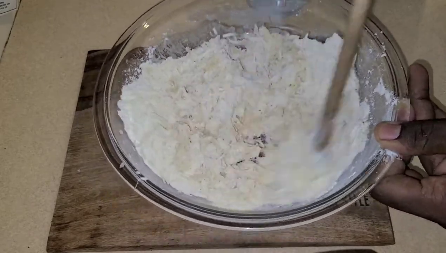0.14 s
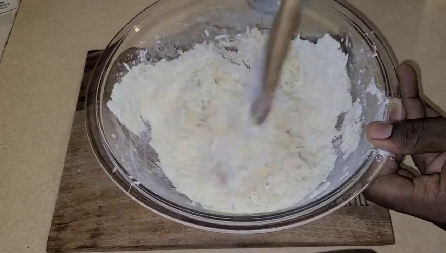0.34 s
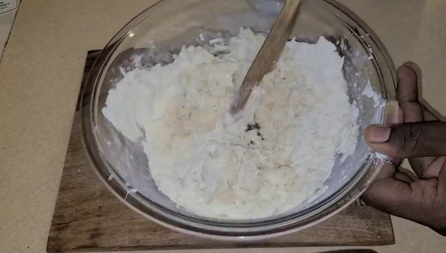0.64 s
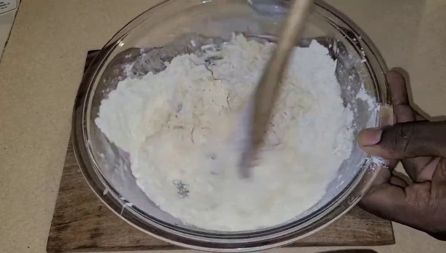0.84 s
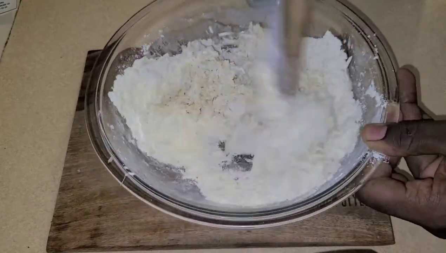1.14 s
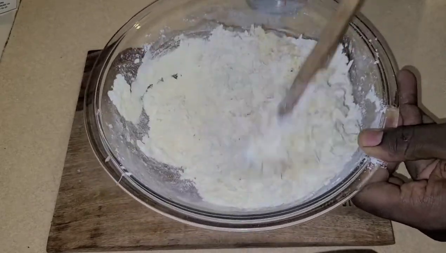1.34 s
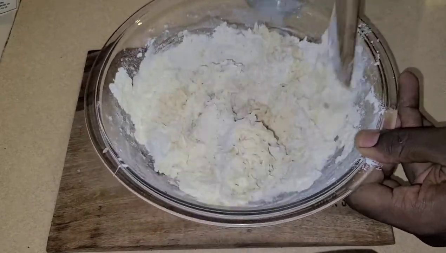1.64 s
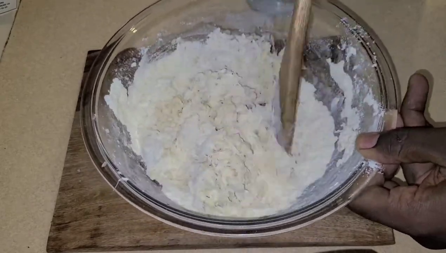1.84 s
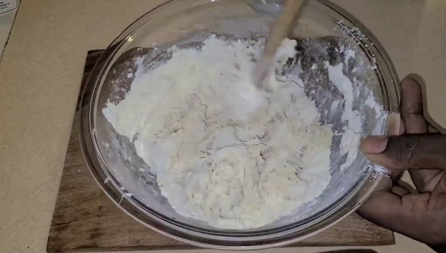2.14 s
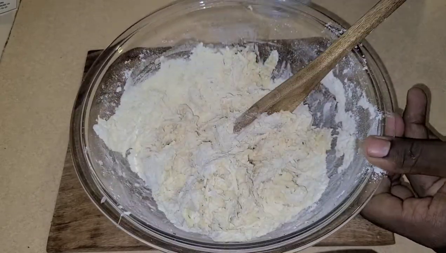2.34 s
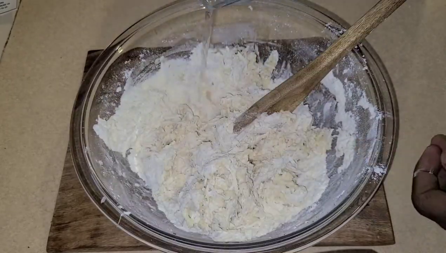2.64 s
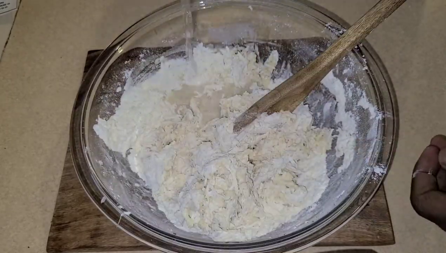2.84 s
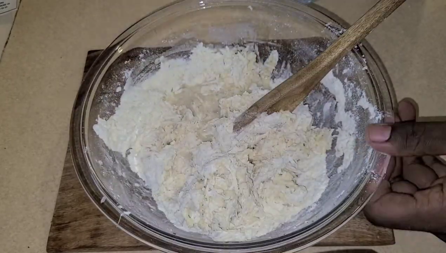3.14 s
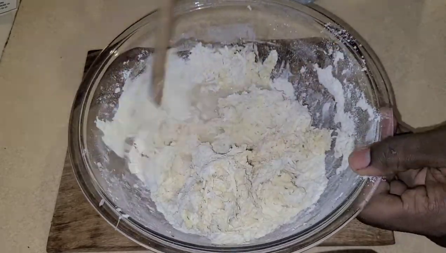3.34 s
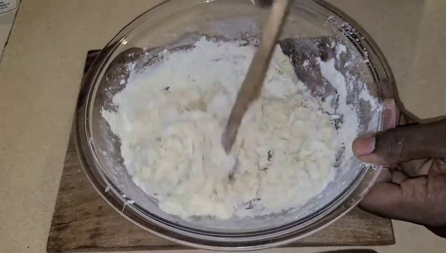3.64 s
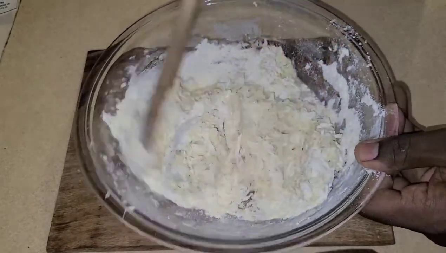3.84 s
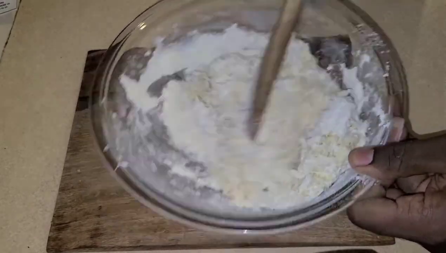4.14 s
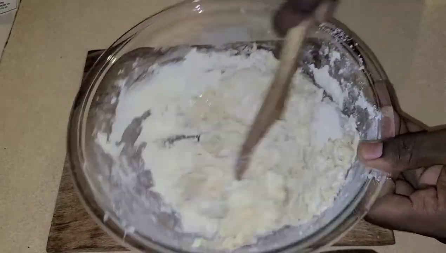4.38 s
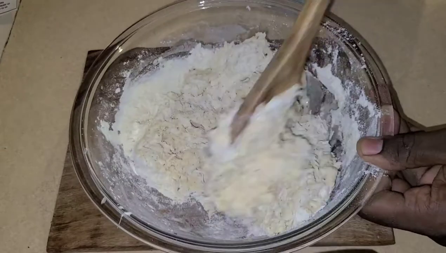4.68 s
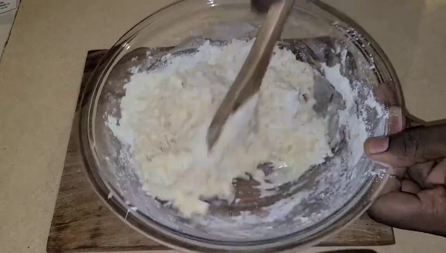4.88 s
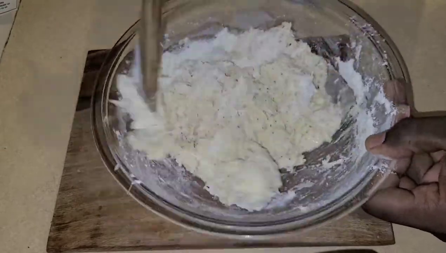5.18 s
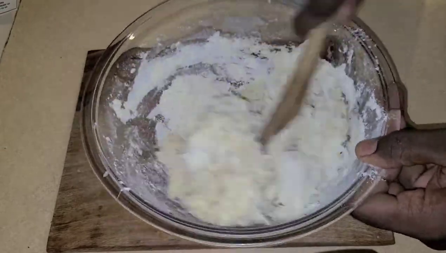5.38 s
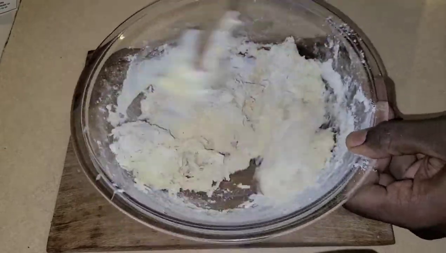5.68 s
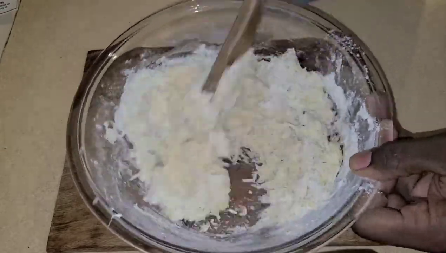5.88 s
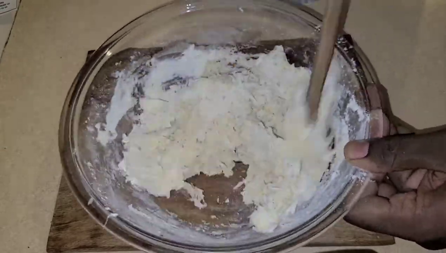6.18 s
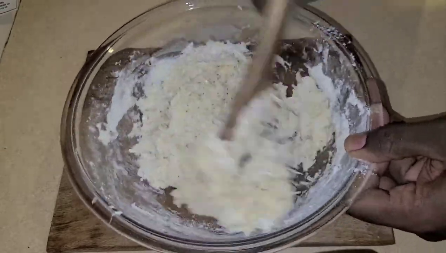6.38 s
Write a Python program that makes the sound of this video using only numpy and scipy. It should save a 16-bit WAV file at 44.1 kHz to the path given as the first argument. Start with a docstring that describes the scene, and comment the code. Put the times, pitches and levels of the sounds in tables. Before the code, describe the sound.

Close, dry stereo pickup in a small kitchen with low rumble and hum. A wooden spoon tears through stiff dough in short grainy strokes, knocking dully on a glass bowl that thuds on a board. Stirring pauses, a little water patters, a cup lands with a loud boom and crack, then stirring resumes harder, with heavier knocks.

```python
"""A wooden spoon stirs stiff, floury dough in a glass bowl on a wooden board: grainy noise bursts hiss and tear.
The spoon knocks on the dough-damped glass, heard as decaying modes, and the bowl thuds on the board as slow swings.
In a pause a dash of water patters as shaped noise, and a cup set down hard booms, cracks and rattles.
That peak pulls the gain down, so the kitchen's rumble, hum and hiss dip and climb back."""
import sys
import numpy as np
from scipy import signal
from scipy.fft import rfft, irfft, next_fast_len
from scipy.io import wavfile
from scipy.ndimage import uniform_filter1d, minimum_filter1d, map_coordinates

SR = 44100
rng = np.random.default_rng(int(sys.argv[2]) if len(sys.argv) > 2 else 0)


def generate_wav(sig):
    """Save sig (samples, or channels by samples) to the path in sys.argv[1] as 16-bit PCM at SR."""
    pcm = np.round(np.clip(np.atleast_2d(sig).T, -1, 1) * 32767).astype(np.int16)
    wavfile.write(sys.argv[1], SR, pcm)


N = 287311

# The spoon shears through the dough. Each row: middle in seconds, relative level in dB, length in seconds.
STROKES = [(0.048, -51.0, 0.033), (0.091, -49.0, 0.019), (0.167, -51.5, 0.035), (0.291, -55.0, 0.076),
           (0.48, -57, 0.07), (0.572, -52, 0.04), (0.72, -56.5, 0.07), (0.939, -45.5, 0.029),
           (1.058, -50.5, 0.033), (1.192, -46.5, 0.036), (1.375, -50.0, 0.046), (1.507, -48.0, 0.041),
           (1.644, -44.5, 0.021), (1.789, -54.0, 0.035), (1.901, -43.5, 0.03), (2.056, -56.0, 0.06),
           (2.178, -45.5, 0.032), (2.265, -53, 0.025), (2.361, -45.0, 0.021), (3.329, -48.0, 0.035),
           (3.602, -51.5, 0.064), (3.724, -47.5, 0.026), (3.854, -52.0, 0.062), (3.973, -46.5, 0.03),
           (4.104, -51.5, 0.047), (4.213, -48.0, 0.05), (4.365, -46.5, 0.038), (4.492, -48.0, 0.036),
           (4.594, -47.5, 0.043), (4.733, -46.0, 0.04), (4.829, -43.5, 0.03), (4.941, -42.0, 0.027),
           (5.033, -44.0, 0.037), (5.172, -47.0, 0.066), (5.353, -50.5, 0.069), (5.461, -47.0, 0.05),
           (5.628, -48.5, 0.056), (5.758, -53.0, 0.058), (5.843, -47.0, 0.035), (5.967, -49.0, 0.028),
           (6.08, -50.0, 0.057), (6.183, -43.5, 0.041), (6.306, -46.0, 0.041), (6.351, -48.0, 0.029),
           (6.454, -45.5, 0.048)]
# The spoon strikes the bowl through dough. Each row: start in seconds, relative force in dB,
# cushioning by the dough in dB, pitch of the bowl's rocking in Hz.
BLOWS = [(0.003, -30, 24, 64), (0.261, -38, 11, 90), (0.811, -25.5, 10, 74), (0.826, -29, 12, 97),
         (1.027, -30.5, 11, 70), (1.052, -29.5, 17, 79), (1.175, -26.5, 18, 85), (1.452, -29, 28, 98),
         (1.879, -33.5, 9, 62), (1.937, -34, 36, 56), (2.187, -34, 30, 78), (2.255, -38, 10, 90),
         (2.367, -29, 30, 141), (3.447, -31, 36, 85), (3.853, -35, 2, 90), (4.094, -27.5, 22, 88),
         (4.439, -23, 18, 105), (4.449, -29, 11, 95), (4.492, -31, 17, 75), (4.576, -41, 5, 90),
         (4.722, -30.5, 4, 91), (4.793, -26.5, 28, 88), (4.933, -27, 11, 80), (5.137, -22, 8, 80),
         (5.149, -32, 3, 90), (5.343, -30, 32, 85), (5.581, -21, 6, 112), (5.592, -21, 10, 57),
         (5.608, -23, 8, 98), (5.71, -38, 7, 100), (5.8, -28, 5, 90), (5.959, -25, 1, 146),
         (6.17, -29, 7, 92), (6.31, -41, -3, 90), (6.414, -29, 36, 75), (6.475, -37, -8, 106)]
# Upper modes of the dough-damped glass. Each row: frequency in Hz, width in Hz, relative level in dB.
BOWL_HIGH = [(1090, 90, 1.5), (1187, 50, 1), (1385, 41, -1), (1680, 37, -7.5), (1788, 160, -0.5),
             (2055, 88, -4.5), (2174, 78, -6.5), (2650, 32, -8), (2984, 68, -9.5)]
# Spectrum of hissing flour. Each row: frequency in Hz, relative level in dB.
FLOUR = [(4000, -42), (7000, 1.5), (9000, -0.5), (11500, 2), (15500, -5)]


def amp(db):
    """Level is logarithmic: 20 dB is a factor of ten in amplitude."""
    return 10 ** (np.asarray(db) / 20)


def unit(x):
    """Root-mean-square normalization: scale to rms 1."""
    return x / np.sqrt(np.mean(x ** 2) + 1e-20)


def along(points, hz):
    """Logarithmic frequency scale: interpolate (Hz, value) points along it."""
    f, v = np.transpose(points)
    return np.interp(np.log(hz + 1), np.log(f + 1), v)


def wobble(rate):
    """Band-limited fluctuation: a smooth curve through random knots, rate of them a second."""
    knots = rng.standard_normal(int(N * rate / SR) + 4)
    return map_coordinates(knots, [np.arange(N) * rate / SR])


def filtered(x, response):
    """Linear filtering: multiply the spectrum of x by a response of frequency."""
    m = next_fast_len(N + SR // 2)
    return irfft(rfft(x, m) * response(np.fft.rfftfreq(m, 1 / SR)), m)[..., :N]


def add(track, s, sound):
    """Superposition: mix a sound into a track from time s in seconds."""
    part = track[..., max(round(s * SR), 0):][..., :sound.shape[-1]]
    part += sound[..., :part.shape[-1]]


def noise(spectrum, grain_db=0):
    """Interaural coherence: stereo noise of rms 1, near mono in the bass; grain_db breaks it into tiny grains."""
    # Each row: frequency in Hz, left-right correlation from 0 to 1.
    alike = [(120, .99), (250, 0.84), (600, 0.69), (1200, 0), (3000, 0), (10000, 0.04)]
    pair = rng.standard_normal((2, N))
    if grain_db:
        pair = pair * amp(abs(grain_db) * wobble(1400))

    def mid_side_response(hz):
        angle = np.arccos(np.clip(along(alike, hz), -1, 1)) / 2
        return amp(along(spectrum, hz)) * [np.cos(angle), np.sin(angle)]

    mid, side = filtered(pair, mid_side_response)
    return unit(np.array([mid + side, mid - side]))


def ring(modes, spread):
    """Modal decay: a wider resonance dies faster; each mode draws a strength, detuning and stereo phase."""
    t = np.arange(SR // 8) / SR
    out = 0
    for hz, width, db in modes:
        strength, detune, side = rng.standard_normal(3)
        pitch = hz * (1 + .008 * detune)
        phase = 2 * np.pi * pitch * t + np.array([[1], [-1]]) * spread * np.tanh(2 * side)
        level = amp(db + 2.25 * strength) * width
        out = out + level * np.exp(-np.pi * width * t) * np.sin(phase)
    return out * (1 - np.exp(-t / 0.00069))  # the contact takes a moment to build up


def swells(levels_db):
    """Energy summation: the joint level of all strokes, each rising and fading around its middle."""
    t = np.arange(0, N + 100, 100) / SR
    middle, _, length = np.transpose(STROKES)[..., None]
    each = amp(levels_db)[:, None] / np.cosh(np.clip(2 * (t - middle) / length, -20, 20))
    return np.interp(np.arange(N) / SR, t, np.linalg.norm(each, axis=0))


def crackle(rate, size_db):
    """Damped bubble oscillation: air pockets in sticky dough pop at random, rate of them a second."""
    out, t = np.zeros((2, N)), np.arange(SR // 80) / SR
    for when, pitch, size, side in rng.random((int(rate * N / SR), 4)):
        hz = 1300 * 5 ** pitch
        size_level = amp(size_db * (-np.log(size + 0.036) - 2))  # many small pops, few large
        pop = size_level * np.sin(2 * np.pi * hz * t) * np.exp(-hz * t / 7)
        add(out, when * N / SR, np.sqrt([[side], [1 - side]]) * pop)
    return out


def strokes():
    """Stick-slip friction: dough tears in fine grains, dry flour hisses and the lump drags on the bowl."""
    # Spectrum of the tearing dough. Each row: frequency in Hz, relative level in dB.
    shear_spectrum = [(200, -21), (600, -3), (1200, 2), (2100, 5), (2600, 1.5), (3000, 3.5), (3700, -3),
                      (4900, -1.5), (6700, -4.5), (7600, -25.5), (10000, -23)]
    # Spectrum of the lump dragging on the bowl. Each row: frequency in Hz, relative level in dB.
    drag_spectrum = [(30, -15), (80, 2), (160, -1), (300, -13), (600, -18), (1200, -59), (3000, -120)]
    ordinary_db = -46  # shear level of an ordinary stroke
    flour_db, flour_grows = -64.2, 1.1  # relative flour level at that stroke, and its dB per dB of stroke
    loose_flour_db = -27  # flour sliding between the strokes, relative to the stirring effort
    brisker_db_per_s = 0.28  # the hiss grows as the stirring gets brisker

    _, shear_db, _ = np.transpose(STROKES)
    shear = swells(shear_db)
    effort = uniform_filter1d(shear, SR // 4)
    stroke_flour = swells(flour_db + flour_grows * (shear_db - ordinary_db))
    flour = np.hypot(stroke_flour, amp(loose_flour_db) * effort)
    grip = amp(2.77 * wobble(110))  # the spoon catches and gives

    tearing = amp(-10) * shear * noise(shear_spectrum, grain_db=2.5)
    glass = ring(BOWL_HIGH, spread=1.0)
    glass = glass / np.linalg.norm(glass[0])
    rubbing = amp(-15.5) * signal.fftconvolve(tearing, glass, axes=1)[:, :N]  # faintly rings the bowl
    hissing = amp(brisker_db_per_s * np.arange(N) / SR) * flour * noise(FLOUR, grain_db=3)
    dragging = amp(3.5) * noise(drag_spectrum)
    popping = amp(-1.5) * crackle(rate=50, size_db=7.5)
    return grip * (tearing + hissing) + rubbing + effort * (dragging + popping)


def knocks():
    """Impact excitation: a landing and a run of slips drive the glass modes; dough mutes the low ones least."""
    # Lower modes of the dough-damped glass. Each row: frequency in Hz, width in Hz, relative level in dB.
    bowl_low = [(171, 25, 4), (238, 63, 2.5), (361.4, 81, 2), (457, 58, -3.5)]
    # Middle modes of the same glass. Each row: frequency in Hz, width in Hz, relative level in dB.
    bowl_mid = [(609, 180, 0.5), (715.5, 73, 2), (980, 150, -8.5)]
    hollow_share, clack_share = 0.5, 1.0  # dB that the low and the high ring lose per dB of cushioning
    chatter_s, chatter_s_per_db = 0.008, 0.0002  # the spoon slips for longer on more dough
    contact_hz, dulling_db = 3600, 9  # bandwidth of a bare contact, and the cushioning that halves it

    out, t = np.zeros((2, N)), np.arange(SR // 16) / SR
    for s, force_db, cushion_db, _ in BLOWS:
        chatter = chatter_s + chatter_s_per_db * cushion_db
        slips = (rng.random(len(t)) < 800 / SR) * rng.standard_normal(len(t))  # about 800 a second
        force = 1.13 * slips * np.exp(-(t / chatter) ** 2)
        force[0] = 1  # the landing itself
        soft_hz = min(contact_hz * 2 ** (-cushion_db / dulling_db), SR / 3)  # dough softens the contact
        force = signal.lfilter(*signal.butter(2, soft_hz, fs=SR), force)
        bands = ((bowl_low, .35, -14.5 - hollow_share * cushion_db),
                 (bowl_mid, .5, -17.5 - cushion_db),
                 (BOWL_HIGH, .9, -23.5 - clack_share * cushion_db))
        for modes, spread, db in bands:
            sound = signal.fftconvolve(ring(modes, spread), force[None], axes=1)
            add(out, s, amp(force_db + db) * unit(sound))
    return out


def thuds():
    """Damped rocking: each push swings the bowl on the board; a glancing blow hardly moves it."""
    lead_s = 0.002  # the dough passes on the push before the spoon reaches the glass
    push_cushion_db, glance_share = 8, 0.7  # below this cushioning the spoon glances: dB of thud lost per dB
    out, t = np.zeros(N), np.arange(SR // 8) / SR
    u = t / 0.0078  # time relative to the envelope's peak
    for s, force_db, cushion_db, hz in BLOWS:
        push_db = force_db + 0.4 - glance_share * max(push_cushion_db - cushion_db, 0)
        swing = u * np.exp(1 - u) * np.sin(2 * np.pi * hz * t)
        add(out, s - lead_s, -amp(push_db) * swing)
    return out


def tinks():
    """Lightly damped resonance: where no dough clings, the rim answers a tap with a short high note."""
    # Light taps on the bare rim. Each row: start in seconds, relative level in dB.
    taps = [(0.5641, -61), (2.2568, -61), (3.1707, -53.5), (3.3099, -54), (3.5628, -57), (5.3238, -56),
            (6.4734, -38.5)]
    # Modes of the rim. Each row: frequency in Hz, width in Hz, relative level in dB.
    rim = [(3380, 70, 0), (3200, 90, -27), (3630, 110, -12)]
    out = np.zeros((2, N))
    for s, db in taps:
        add(out, s, amp(db - 19.5) * unit(ring(rim, spread=0.53)))
    return out


def clicks():
    """Transient excitation: drops, crumbs and snapping strands each give a short, decaying noise burst."""
    # The clearest of them. Each row: start in seconds, relative level of the tick in dB, of the lower snap in dB.
    events = [(1.3123, -52, -64), (2.802, -54, -57), (2.8527, -44, -47), (2.872, -36.5, -27),
              (2.8804, -55, -40), (3.71, -47.5, -59), (3.8721, -52, -45), (4.0376, -50.5, -54),
              (4.9831, -48, -47), (5.2679, -51, -85), (6.1674, -38.5, -53), (6.4762, -47, -38.5)]
    # Spectrum of the snap. Each row: frequency in Hz, relative level in dB.
    snap_spectrum = [(200, 3), (700, 9.5), (2000, -1.5), (4000, -11.5), (6000, 5), (7500, -11),
                     (12000, -29)]
    tick, snap, t = np.zeros(N), np.zeros(N), np.arange(SR // 16) / SR
    rise = 1 - np.exp(-t / .0012)
    for s, db, snap_db in events:
        add(tick, s, rise * amp(db - 2.5 - 60 * t / 0.022))
        add(snap, s, rise * amp(snap_db + 1 - 60 * t / 0.023))
    return tick * noise(FLOUR) + snap * noise(snap_spectrum)


def pour():
    """Random impacts: a thin stream of water patters into the flour as grainy noise."""
    # A dash of water. Each row: middle in seconds, relative level in dB, length in seconds.
    dashes = [(2.67, -63.5, 0.012), (2.78, -62, 0.037)]
    t = np.arange(N) / SR
    flow = sum(amp(db) * np.exp(-((t - s) / length) ** 2) for s, db, length in dashes)
    patter = [(500, -20), (2000, -5), (5500, -3), (8000, -9.5), (15000, -16.5)]  # Hz, relative dB
    return flow * noise(patter, grain_db=4.5)


def bump():
    """Structural impact: the cup sets off the counter's deep mode, smaller modes, a dry crack and a rattle."""
    # The counter's deepest mode: frequency in Hz, time to decay by 60 dB in seconds.
    boom_hz, boom_t60 = (148.3, 0.082)
    # Modes of cup and counter. Each row: frequency in Hz, width in Hz, relative level in dB.
    ring_modes = [(105, 19.3, 8), (198, 52, -6), (246, 24, 6), (289, 33, -14), (392, 25, -8),
                  (484, 13, -16.5), (636, 20, -12), (728, 16, -26.5), (978, 33, -25), (1390, 35, -35),
                  (2000, 39, -28), (2300, 35, -28), (2570, 42, -38), (4180, 70, -32), (4800, 49, -37),
                  (5760, 83, -34), (8540, 90, -40), (11480, 90, -38)]
    # Spectrum of the crack. Each row: frequency in Hz, relative level in dB.
    crack_spectrum = [(60, -41), (250, 4), (700, -1.5), (1300, -6), (2150, 8.5), (2700, -1.5), (4200, -3.5),
                      (5800, -8), (9000, -9.5), (11500, -5), (16000, -11.5)]
    # Spectrum of the rattle. Each row: frequency in Hz, relative level in dB.
    rattle_spectrum = [(80, -44), (250, 0), (650, -4), (1000, -19), (2300, -24), (4000, -44.5)]
    start_s = 3.029

    body, (crack, rattle) = np.zeros((2, N)), np.zeros((2, N))
    t = np.arange(SR // 8) / SR
    onset = 1 - np.exp(-(t / 0.0039) ** 2)
    swing = np.sin(2 * np.pi * boom_hz * t) * amp(-60 * t / boom_t60) * onset
    add(body, start_s, -amp(6) * swing / np.abs(swing).max())
    add(body, start_s, -amp(-13.5) * unit(ring(ring_modes, spread=0.37)))
    body = signal.lfilter(*signal.butter(2, 70, "highpass", fs=SR), body)  # little of the bump sounds below about 70 Hz
    crack_decay = amp(-17.5 - 60 * t / 0.031) + amp(-41 - 60 * t / 0.05)  # a strong fast part and a weak slow one
    add(crack, start_s, crack_decay * (1 - np.exp(-t / 0.00042)))
    add(rattle, start_s, amp(-21.5) * np.exp(-(t / 0.035) ** 4))  # the rattle stops once the cup settles
    return body + crack * noise(crack_spectrum) + rattle * noise(rattle_spectrum)


def room(x):
    """Reverberation: a decaying noise response, different at each ear, with its own decay time per frequency."""
    # Each row: frequency in Hz, time to decay by 60 dB in seconds.
    decay_times = [(100, 0.24), (600, 0.067), (3000, 0.14), (12000, 0.24)]
    hz, t, z = signal.stft(rng.standard_normal((2, SR // 3)), SR, nperseg=256)
    decay = amp(-60 * t / along(decay_times, hz)[:, None])
    tail = signal.istft(z * decay, SR, nperseg=256)[1]
    return signal.fftconvolve(x, tail / np.linalg.norm(tail[0]), axes=1)[:, :N]


def kitchen():
    """Stationary noise: an air rumble, a rough low hum in a narrow band and a thin hiss."""
    # Spectrum of the rumble. Each row: frequency in Hz, relative level in dB.
    rumble_spectrum = [(12, -36), (20, -10), (48, 2), (107, -3), (156, -3.5), (202, -20.5), (236, -7),
                       (275, -16.5), (344, -14.5), (381, -20.5), (452, -12), (510, -20.5), (659, -20.5),
                       (837, -27.5), (1200, -39.5), (1560, -46), (2640, -120)]
    # Spectrum of the hum. Each row: frequency in Hz, relative level in dB.
    hum_spectrum = [(40, -120), (70, -32.5), (90, -8.5), (102, 2), (116, -10.5), (140, -32.5), (300, -120)]
    # Spectrum of the hiss. Each row: frequency in Hz, relative level in dB.
    hiss_spectrum = [(700, -41), (1100, 5.5), (1500, -2), (1850, 3.5), (2600, -7.5), (3300, -1.5),
                     (3900, -5.5), (6000, -8.5), (6700, 0.5), (7400, -14), (8000, -20), (11500, -12.5),
                     (15500, -16.5)]
    rumble = amp(-44.5) * noise(rumble_spectrum)
    hum = amp(-51.5) * noise(hum_spectrum)
    hiss = amp(-66) * noise(hiss_spectrum)
    return rumble + hum + hiss


def scene():
    """Superposition of all sources; a small level difference sets the whole mix a little left of centre."""
    stirring = strokes() + knocks() + tinks() + clicks() + pour()
    mix = stirring + amp(-11) * room(stirring) + thuds() + bump() + kitchen()
    return mix * amp([[.4], [-.4]])


def gain_control(x, ceiling_db, recovery_db):
    """Peak limiting: a peak over the ceiling pulls the gain down; it climbs back by recovery_db a second."""
    peak_db = 20 * np.log10(np.abs(x).max(axis=0) + 1e-9)
    needed = np.minimum(ceiling_db - peak_db, 0)
    climb = recovery_db * np.arange(N) / SR
    held = np.minimum.accumulate(needed - climb) + climb
    smooth = uniform_filter1d(minimum_filter1d(held, size=221), size=221)  # eases in around the peak
    return x * amp(smooth)


def record(dry):
    """Limiting and band limitation: the gain follows the peaks and nothing above the top frequency remains."""
    top_hz = 15900
    level = gain_control(dry, ceiling_db=-1.6, recovery_db=17)
    return filtered(level, lambda hz: hz < top_hz)


dry = scene()
out = record(dry)
generate_wav(out)
```